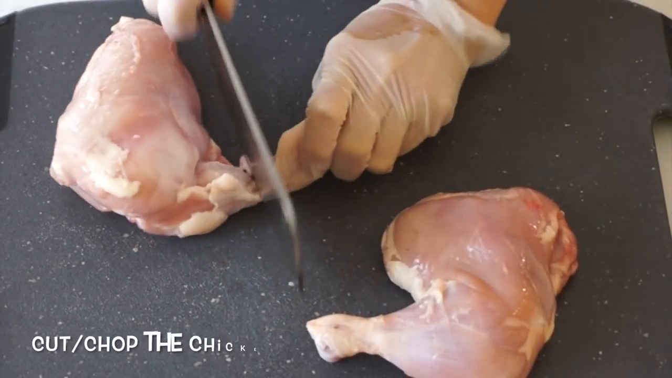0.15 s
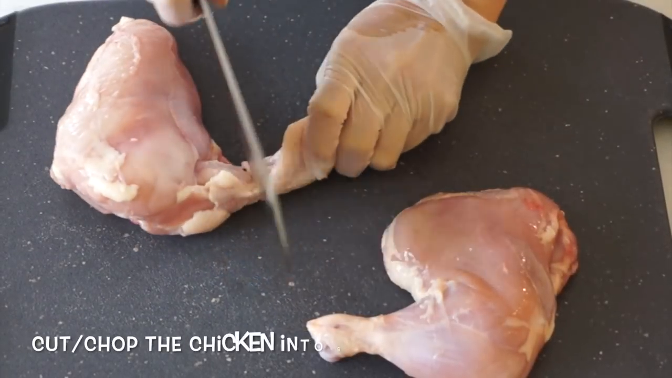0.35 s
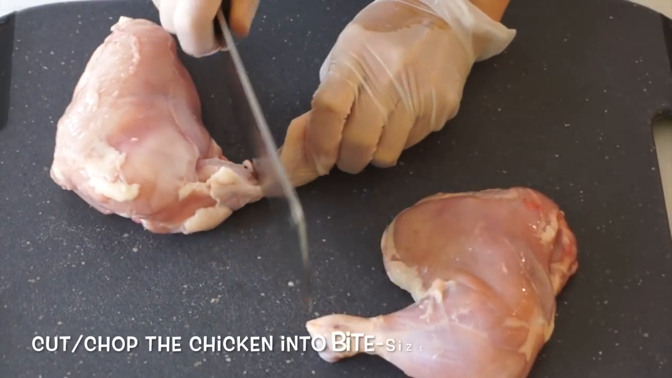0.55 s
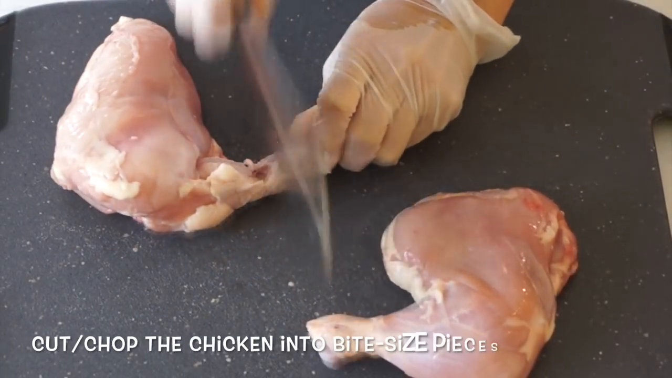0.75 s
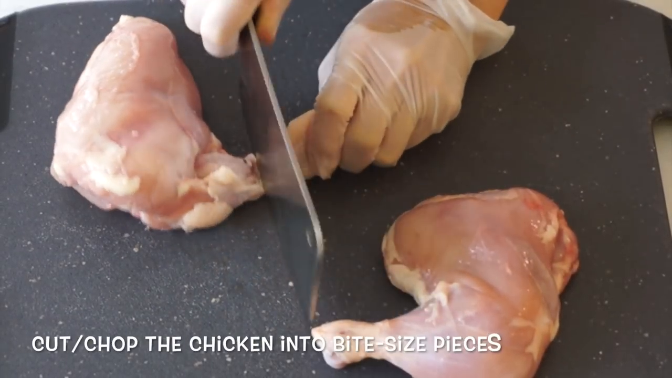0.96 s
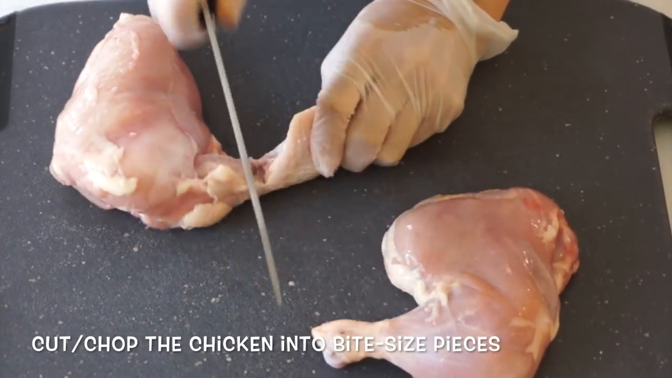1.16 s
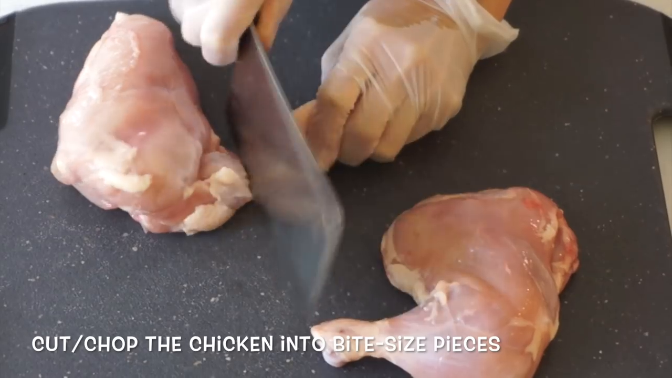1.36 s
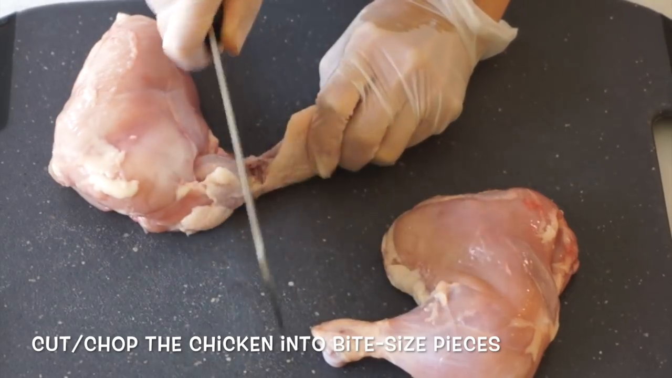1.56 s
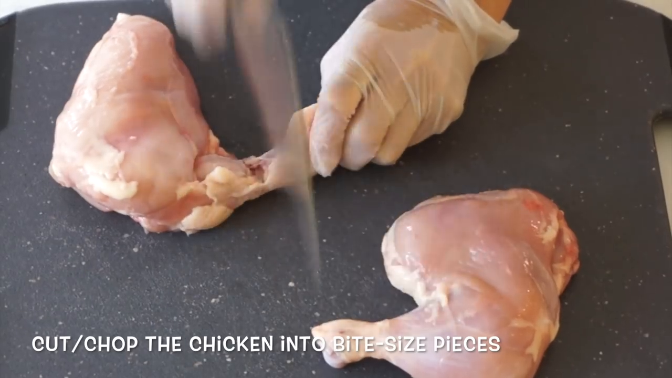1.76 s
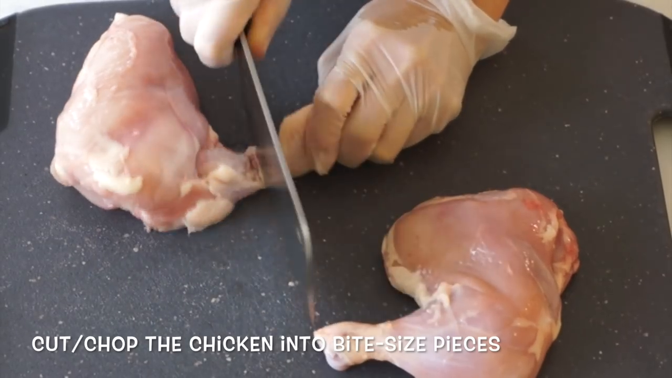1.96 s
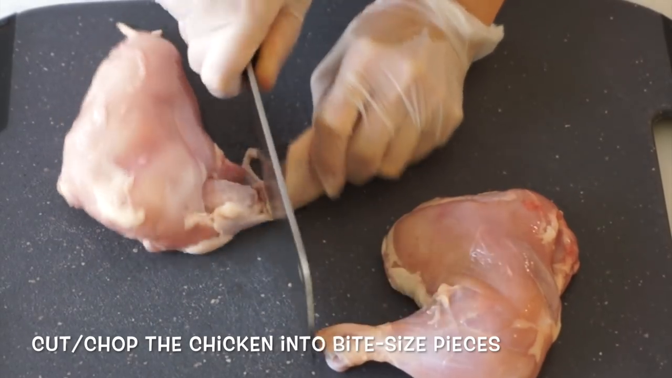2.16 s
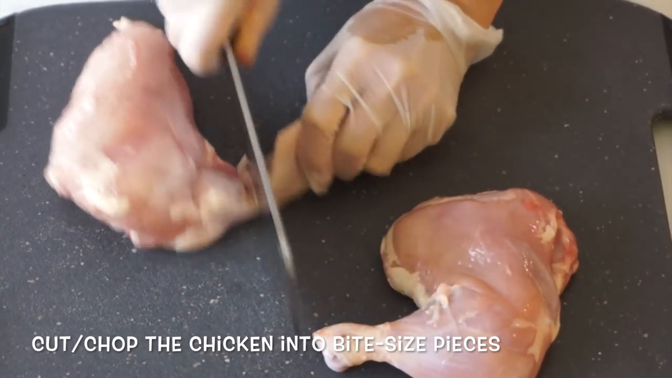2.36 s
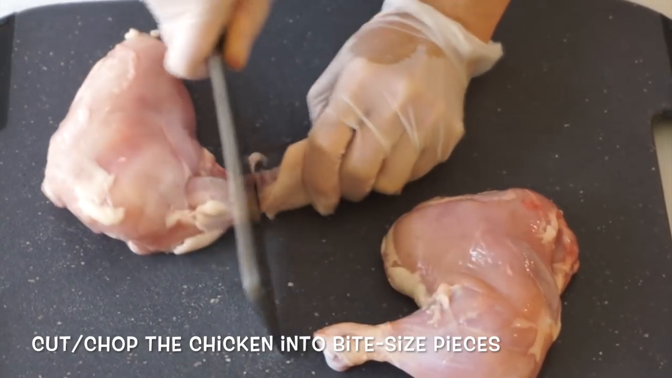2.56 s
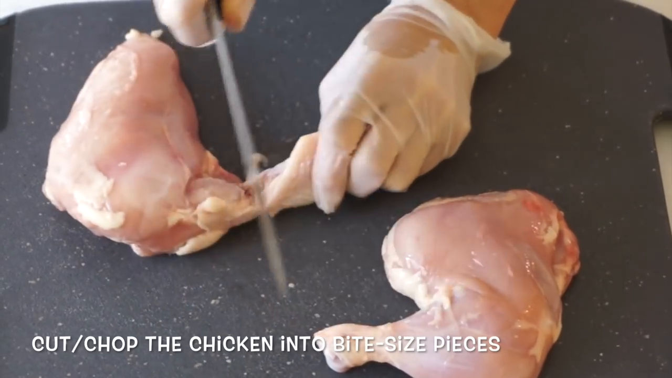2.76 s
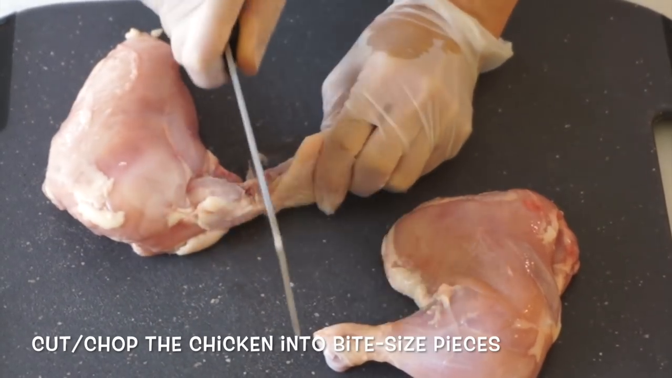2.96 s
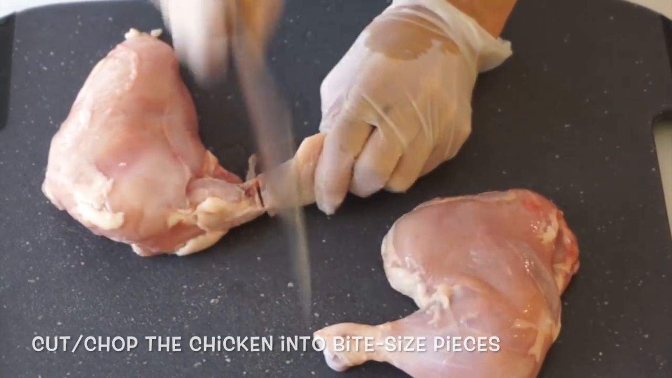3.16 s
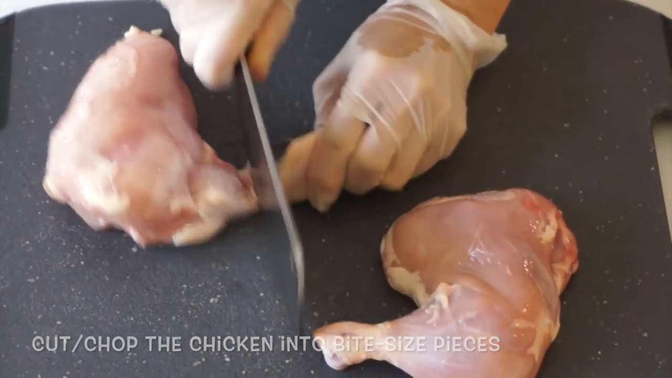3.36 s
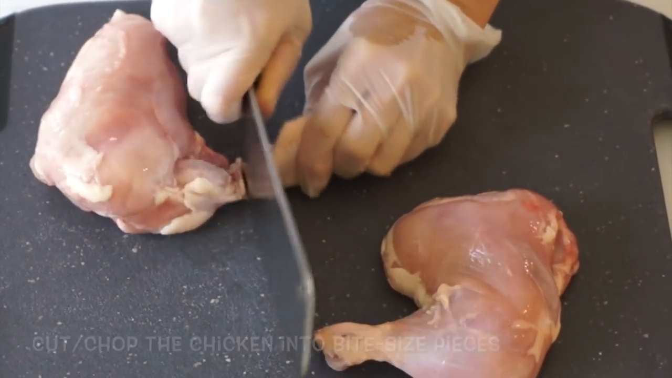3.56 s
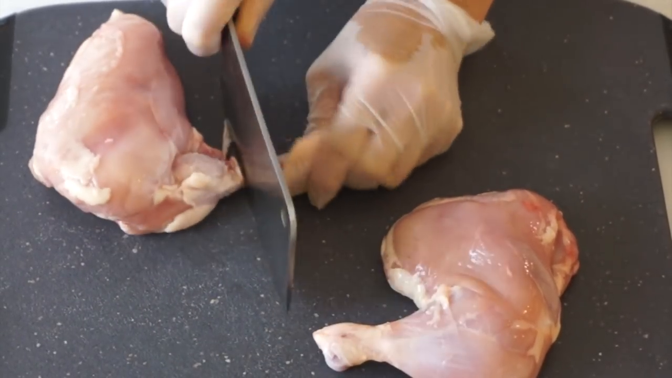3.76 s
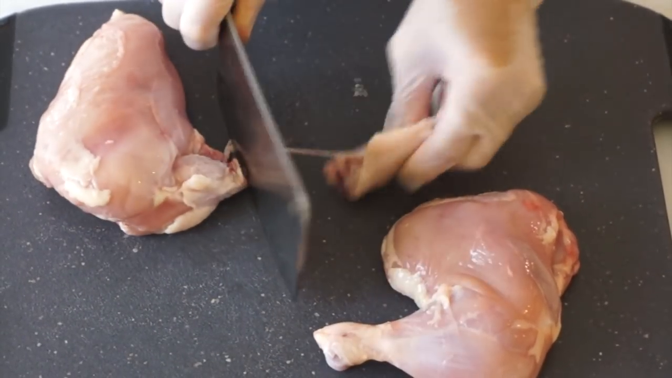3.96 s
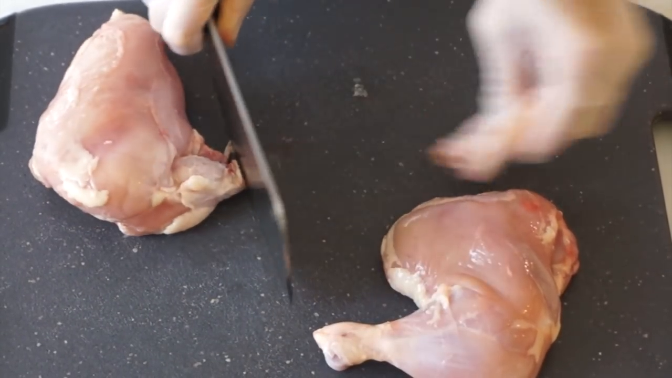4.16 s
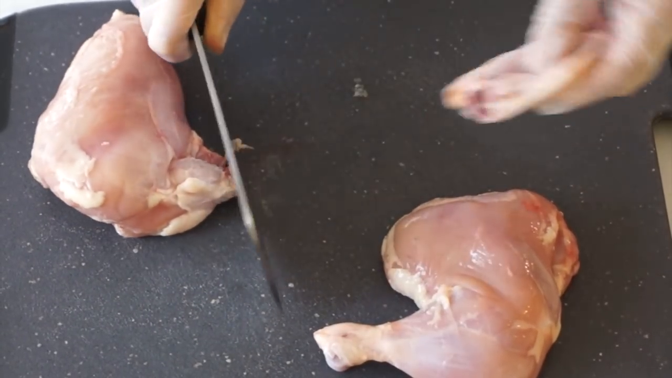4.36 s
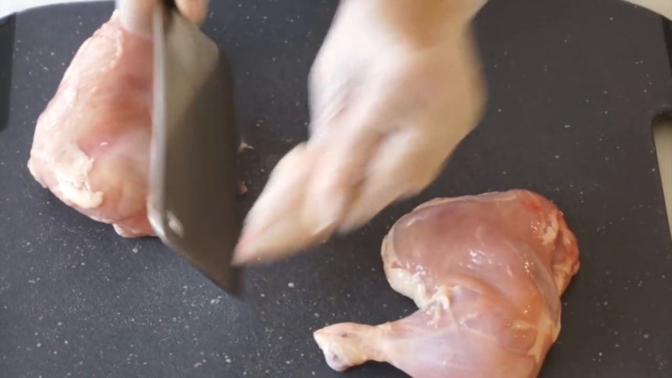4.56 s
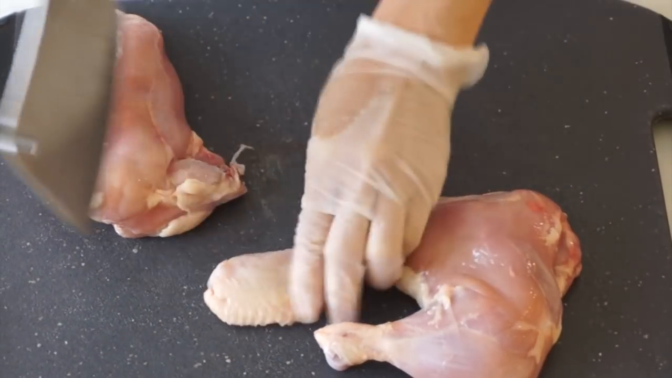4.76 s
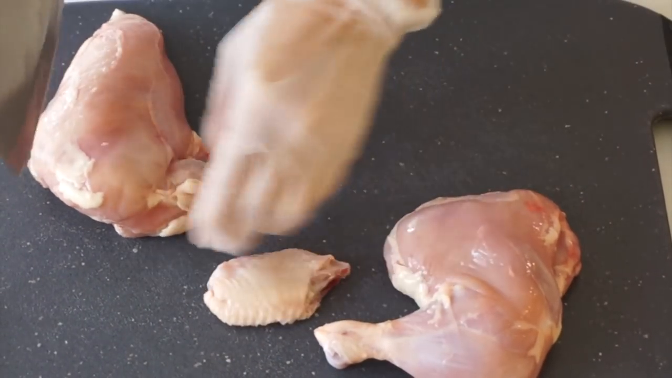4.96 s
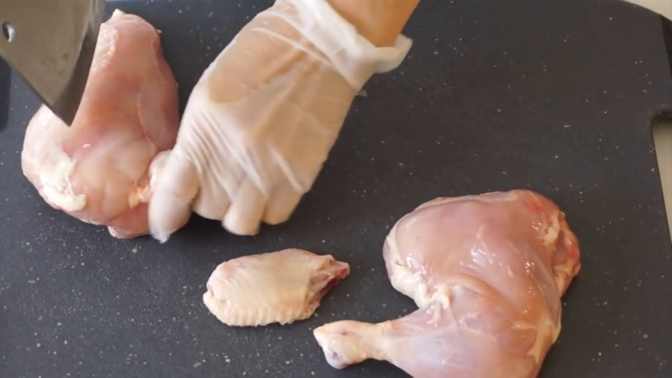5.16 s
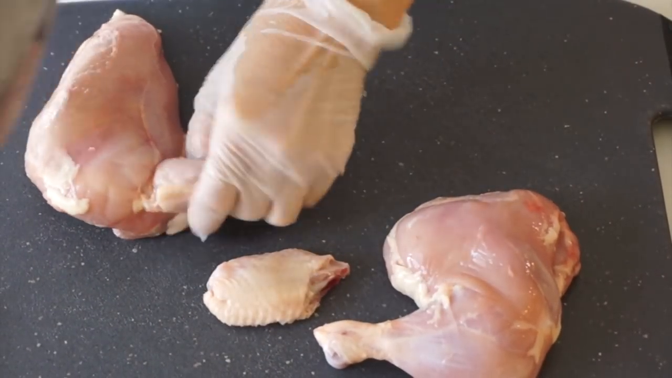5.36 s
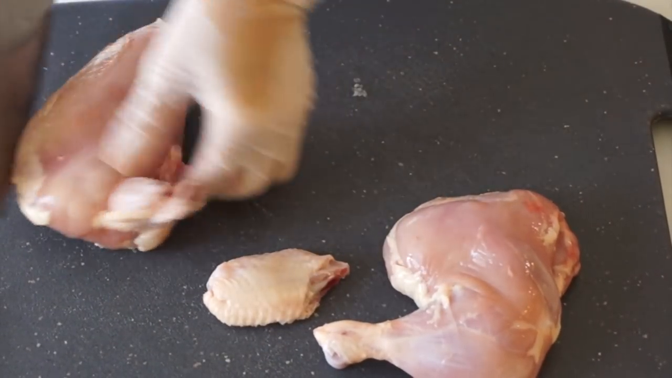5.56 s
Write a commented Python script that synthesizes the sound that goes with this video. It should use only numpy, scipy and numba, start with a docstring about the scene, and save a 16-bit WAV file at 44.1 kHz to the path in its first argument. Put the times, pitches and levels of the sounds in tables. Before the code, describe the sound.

A cleaver chops raw chicken on a plastic board with sharp, uneven knocks, then gristle snaps softly over a faint fan hum.

```python
"""Chopping chicken in a kitchen

Two closely spaced microphones in a hard-walled kitchen, a fan humming underneath. A cleaver chops
through a raw chicken leg on a plastic board: each blow knocks the board, sets the room ringing and
draws a thin steel ring from the blade. Between blows wet meat squelches and gristle snaps.
The recorder's gain control flattens the blows and ducks after the heaviest."""
import sys
import numpy as np
from scipy import signal
from scipy.fft import rfft, irfft
from scipy.io import wavfile
from scipy.ndimage import uniform_filter1d, minimum_filter1d
from numba import njit

SR = 44100
rng = np.random.default_rng(int(sys.argv[2]) if len(sys.argv) > 2 else 0)


def generate_wav(signal):
    """Clip the signal to [-1, 1] and save it as 16-bit WAV at the path in sys.argv[1]."""
    frames = np.transpose(np.atleast_2d(signal))
    scaled = np.clip(frames, -1, 1) * 32767
    pcm = np.round(scaled).astype(np.int16)
    wavfile.write(sys.argv[1], SR, pcm)


N = 247401
TIME = np.arange(N) / SR
FREQ = np.maximum(np.arange(N // 2 + 1) * SR / N, 1)

# The fan's rush of air. Each row: frequency in Hz, relative level in dB.
FAN_AIR = [(25, -50), (65, -19.5), (135, -25.5), (215, -4), (300, -2), (560, -1), (840, -2), (1200, -4),
           (1700, -9), (2400, -14.5), (3400, -21), (4800, -25), (7000, -28.5), (13000, -27)]
# The fan's hum. Each row: pitch in Hz, level in dB.
FAN_TONES = [(72, -88.5), (299, -66), (367, -72.5), (393, -69), (438, -65.5), (486, -61)]
# Stereo width of diffuse sound at the microphones. Each row: frequency in Hz, side against mid in dB.
STEREO_WIDTH = [(40, -8), (150, -12), (300, -21.5), (900, -11), (4000, -8), (8000, -8), (13000, -18)]
# The kitchen's decay. Each row: frequency in Hz, seconds to fall 60 dB.
ROOM_DECAY = [(100, 0.25), (300, 0.2), (800, .5), (2000, 0.5), (5000, 0.4573), (13000, 0.44)]
# The colour of its reverberation. Each row: frequency in Hz, relative level in dB.
ROOM_COLOUR = [(100, -2), (300, 0), (800, 3), (2500, 2), (6000, 0), (13000, -2)]
# Short echoes between blade, board and worktop. Each row: delay in seconds, strength.
NEAR_ECHOES = [(.00031, 0.36), (.00083, 0.26), (.00157, .45)]
# Meat and glove sliding and peeling. Each row: start and length in seconds, level in dB, centre in Hz,
# width in octaves.
MEAT_SQUELCHES = [ (0.036, 0.062, -59.5, 8100, 5.6), (0.112, 0.09, -55.5, 2460, 1.2),
                  (1.821, 0.12, -48, 4860, 0.59), (2.115, 0.037, -53.5, 2920, 0.55),
                  (2.125, 0.3, -60, 10000, 3.5), (2.406, 0.043, -50.5, 4170, 1.45),
                  (3.636, 0.077, -47, 1480, 1), (3.84, 0.067, -60, 10100, 1),
                  (5.032, 0.046, -55.5, 900, 0.84), (5.095, 0.066, -55, 5200, 1.1),
                  (5.367, 0.13, -60.5, 4900, 0.85), (5.469, 0.28, -64.5, 4140, 1), ]
# Gristle snapping. Each row: start in seconds, level in dB, centre in Hz, width in octaves.
GRISTLE_SNAPS = [(2.0153, -50.5, 2750, 0.31), (2.33, -51.5, 3580, 0.35), (3.4289, -32, 1950, 1.05),
                 (3.4969, -36, 2170, 1.07), (3.8116, -56, 1800, 0.7), (3.8432, -56, 1510, 1.2),
                 (4.7587, -57.5, 2800, 1.2)]
# Wet skin parting. Each row: start in seconds, level in dB, centre in Hz.
SKIN_TICKS = [(0.0609, -63, 7750), (2.22, -53.5, 12800), (2.413, -61, 10600), (3.4288, -50.5, 7850),
              (3.6557, -51.5, 10000)]
# Soft bumps and plops of the meat. Each row: start in seconds, level in dB, centre in Hz.
MEAT_BUMPS = [(2.445, -56.5, 233), (2.523, -46.5, 980), (2.751, -55.5, 232), (3.013, -55, 220),
              (3.498, -50.5, 312), (5.0595, -49.5, 890)]
# The steel blade. Each row: pitch in Hz, relative level in dB, seconds to fall 60 dB.
BLADE_MODES = [(1385, 2.5, 1.05), (1450, 5, 0.49), (2330, 1, 0.46), (4340, -7, 0.46), (4530, -19, 0.65)]
# The board on the worktop. Each row: pitch in Hz, relative level in dB, seconds to fall 60 dB.
BOARD_MODES = [(94.7, -35, 0.51), (193, -26, 0.2), (322.5, -21.5, 0.43), (410.7, -20.5, 0.37),
               (540, -9, 0.27), (710, -17, 0.36), (966, -23, 0.38), (1200, -54, 0.18), (1380, -31, 0.37),
               (1485, -18, 0.19), (1817, -25, 0.081), (2770, -37, 0.2)]
# The knock of steel through meat on the board. Each row: frequency in Hz, relative level in dB.
KNOCK_SPECTRUM = [(30, -54), (65, -27), (90, -17), (130, -32), (210, -13), (310, 1), (600, 0), (900, 2),
                  (1700, -6), (3400, -15.5), (6700, -24.5), (13000, -27)]
# The centres in Hz of a blow's thud, knock, crack, snap and splat.
BLOW_BANDS_HZ = [200, 750, 2400, 4700, 10000]
# Cleaver blows. Each row: start in seconds, level in dB; thud, bone crack, edge snap, wet splat and
# board ring in relative dB; the struck spot's pitch in Hz and its relative level in dB.
BLOWS = [ (0.4002, -40, 3, 18.5, 18, 11.5, -7, 2046, -7.5), (0.8150, -19, 5.5, 0, -6, 2, 0, 488, -20),
         (1.3464, -13.5, -4, 0.5, 0.5, -1.5, -0.5, 702, -16),
         (1.7990, -12, -2.5, 3.5, -0.5, 2.5, -14, 1006, -11), (1.8970, -37, 4, -3, 1, -10, -14, 976, -16),
         (2.5914, -27, -22.5, 8, -3, -16, -14, 777, -2), (3.205, -36.5, -24, -7, -8.5, 3, -19, 425, 5.5),
         (3.2095, -0.5, -5.5, 14.5, 12, 0, -12, 760, -9), ]


def undb(db):
    """Decibels to gain."""
    return 10 ** (np.asarray(db) / 20)


def along(points, hz):
    """Read (Hz, value) points on a log-frequency axis."""
    f, value = np.transpose(points)
    return np.interp(np.log(hz), np.log(f), value)


def unit(x):
    """Scale to an energy of one."""
    return x / np.sqrt(np.sum(x ** 2))


def add(track, start_s, sound, db):
    """Mix in a sound; db is the level of unit energy packed into a hundredth of a second."""
    start = int(start_s * SR)
    part = sound[:N - start]
    track[start:start + len(part)] += part * undb(db) * np.sqrt(SR) / 10


def click(db_at, size=4096):
    """The causal, unit-energy click whose spectrum has the shape db_at(Hz)."""
    hz = np.maximum(np.arange(size // 2 + 1) * SR / size, 1)
    cepstrum = irfft(np.log(undb(db_at(hz))))
    cepstrum[1:size // 2] *= 2
    cepstrum[size // 2 + 1:] = 0
    return unit(irfft(np.exp(rfft(cepstrum))))


def pop(centre_hz, octaves):
    """A click with one broad resonance."""
    return click(lambda hz: -40 * np.log10(1 + (np.log2(hz / centre_hz) / (2 * octaves)) ** 2))


def ring(modes):
    """Decaying sines, each with the energy its dB gives; a mode radiates only near its own pitch."""
    t, out = TIME[:SR], 0
    for hz, db, t60 in modes:
        sine = np.sin(2 * np.pi * hz * t) * undb(-60 * t / t60)
        near_pitch = signal.butter(2, [hz / 2, hz * 2], "bandpass", fs=SR, output="sos")
        out = out + undb(db) * unit(signal.sosfilt(near_pitch, sine))
    return out


def diffuse(spectrum_db):
    """Noise that reaches the pair of microphones from all sides."""
    side_db = spectrum_db + along(STEREO_WIDTH, FREQ)
    mid = irfft(rfft(rng.standard_normal(N)) * undb(spectrum_db), N)
    side = irfft(rfft(rng.standard_normal(N)) * undb(side_db), N)
    return np.array([mid + side, mid - side])


def fan(air_db=-54.5, tone_width_hz=1.83):
    """In the background, from all around: a steady rush of air with a few narrow, unsteady tones."""
    air = diffuse(along(FAN_AIR, FREQ))
    tone_power = 0
    for hz, db in FAN_TONES:
        peak = unit(np.exp(-np.abs(FREQ - hz) / tone_width_hz))
        tone_power += (undb(db) * peak) ** 2
    hum = diffuse(10 * np.log10(tone_power * len(FREQ) + 1e-18))
    return air / air.std() * undb(air_db) + hum


def flutter(count=6, trip_s=0.008, uneven_s=0.000396, first_db=-11.5, loss_db=0.5, dull_hz=3900):
    """Frequency response of a few dull echoes between facing walls, nearly evenly spaced."""
    lags = trip_s * np.arange(1, count + 1) + uneven_s * rng.standard_normal(count)
    echoes = sum(undb(first_db - trip * loss_db) * np.exp(-2j * np.pi * FREQ * lag)
                 for trip, lag in enumerate(lags))
    return echoes / (1 + 1j * FREQ / dull_hz)


def kitchen(sound, gap_s=0.0027, build_s=0.0014, tail_db=-0.5):
    """From board to microphones: nearby surfaces smear the sound, the walls flutter and reverberate."""
    t, tail = TIME[:SR], 0
    noise = rfft(diffuse(along(ROOM_COLOUR, FREQ)))
    onset = 1 - np.exp(-np.maximum(t - gap_s, 0) / build_s)
    bands_hz, decays_s = np.transpose(ROOM_DECAY)
    for weights, t60 in zip(np.eye(len(bands_hz)), decays_s):
        band = along(list(zip(bands_hz, weights)), FREQ)
        fade = undb(-60 * t / t60)
        tail = tail + irfft(noise * band, N)[:, :SR] * unit(fade * onset)
    smear = 1
    for lag_s, strength in NEAR_ECHOES:  # all-pass echoes spread a click without colouring it
        delay = np.exp(-2j * np.pi * FREQ * lag_s)
        feedback = np.tanh(strength)
        smear = smear * (feedback + delay) / (1 + feedback * delay)
    early = irfft(smear * (1 + flutter()), N)[:SR]
    return signal.fftconvolve(sound[None], early + undb(tail_db) * tail, axes=1)[:, :N]


def meat(pops_per_s=2500, spread_db=3.5):
    """Wet films tear in a swell of tiny pops of uneven size."""
    out = np.zeros(N)
    for start_s, length_s, db, centre_hz, octaves in MEAT_SQUELCHES:
        n = int(length_s * SR)
        sizes = rng.choice([-1, 1], SR) * undb(spread_db * rng.exponential(size=SR))
        tears = sizes * (rng.random(SR) < pops_per_s / SR)
        swell = np.sin(np.pi * np.arange(n) / n)
        squelch = signal.fftconvolve(tears[:n] * swell, pop(centre_hz, octaves))
        add(out, start_s, unit(squelch) * np.sqrt(length_s) * 10, db)
    return out


def gristle():
    """Gristle snaps, wet skin ticks and the meat bumps on the board as it is worked loose."""
    out = np.zeros(N)
    for start_s, db, centre_hz, octaves in GRISTLE_SNAPS:
        add(out, start_s, pop(centre_hz, octaves), db)
    for start_s, db, centre_hz in SKIN_TICKS:
        add(out, start_s, pop(centre_hz, octaves=0.21), db)
    for start_s, db, centre_hz in MEAT_BUMPS:
        add(out, start_s, pop(centre_hz, octaves=0.31), db)
    return out


def blade(ring_db=-19, bone_grip=1.3):
    """The blade's thin steel ring after a blow; less when flesh cushions the edge or bone grips it."""
    out, steel = np.zeros(N), ring(BLADE_MODES)
    for start_s, db, _, crack, snap, *_ in BLOWS:
        cushion_db, grip_db = min(snap, 0), -bone_grip * max(crack, 0)
        add(out, start_s, steel, db + ring_db + cushion_db + grip_db)
    return out


def cleaver(spot_t60=0.055, hollow_hz=400.3, hollow_db=-15, hollow_t60=0.13,
            scatter_db=2, thud_below_hz=250):
    """Each blow is a knock coloured by what the edge meets, the board's short hollow ring and its modes."""
    out = np.zeros(N)
    for start_s, db, thud, crack, snap, splat, board_db, spot_hz, spot_db in BLOWS:
        colour = list(zip(BLOW_BANDS_HZ, [thud, 0, crack, snap, splat]))
        knock = click(lambda hz: along(KNOCK_SPECTRUM, hz) + along(colour, hz))
        short_ring = ring([(spot_hz, spot_db, spot_t60), (hollow_hz, hollow_db, hollow_t60)])
        # every blow lands on another spot, so the board's modes get other shares
        shares_db = scatter_db * rng.standard_normal(len(BOARD_MODES))
        # only a heavy thud wakes the lowest modes
        board = ring([(hz, mode_db + share_db + thud * (hz < thud_below_hz), t60)
                      for (hz, mode_db, t60), share_db in zip(BOARD_MODES, shares_db)])
        add(out, start_s, knock, db)
        add(out, start_s, short_ring, db)
        add(out, start_s, board, db + board_db)
    return out


def scene():
    """At the microphones: cleaver, gristle and meat through the room, the blade dry, the fan beneath."""
    return kitchen(cleaver() + gristle() + meat()) + blade() + fan()


def slow_gain(x, threshold_db=-20.5, hold_s=1.0, glide_s=0.84, depth_db=5):
    """After a long overload on the left microphone the gain glides down, waits and glides back."""
    rms = np.sqrt(np.abs(uniform_filter1d(x[0] ** 2, SR // 5)) + 1e-18)
    cut_db = np.clip(threshold_db - 20 * np.log10(rms), -depth_db, 0)
    hold, glide = int(hold_s * SR), int(glide_s * SR)
    held_db = minimum_filter1d(cut_db, hold, origin=(hold - 1) // 2, mode="constant")
    return undb(uniform_filter1d(held_db, glide, origin=(glide - 1) // 2, mode="constant"))


@njit
def follow(x, attack, release):
    """Envelope that rises and falls at different speeds."""
    out, level = np.empty(len(x)), 0.
    for i in range(len(x)):
        level += (x[i] - level) * (attack if x[i] > level else release)
        out[i] = level
    return out


def limiter(x, ceiling_db=-16.5, attack_s=0.0001, release_s=0.011, ahead_s=0.00114):
    """Fast gain that holds the blows down and lets go while the room still rings."""
    envelope = follow(np.abs(x).max(axis=0), 1 / (1 + attack_s * SR), 1 / (1 + release_s * SR))
    ahead = np.interp(TIME + ahead_s, TIME, envelope)
    return (1 + (ahead / undb(ceiling_db)) ** 4) ** (-1 / 4)


def record(dry):
    """The recorder: slow gain control, limiter, rounding of the last spikes and a steep treble cut."""
    headroom, top_hz = 0.26, 13700
    levelled = dry * slow_gain(dry)
    limited = levelled * limiter(levelled)
    rounded = headroom * np.tanh(limited / headroom)
    lowpass = signal.ellip(10, .2, 70, top_hz, fs=SR, output="sos")
    return signal.sosfilt(lowpass, rounded)


dry = scene()
out = record(dry)
generate_wav(out)
```